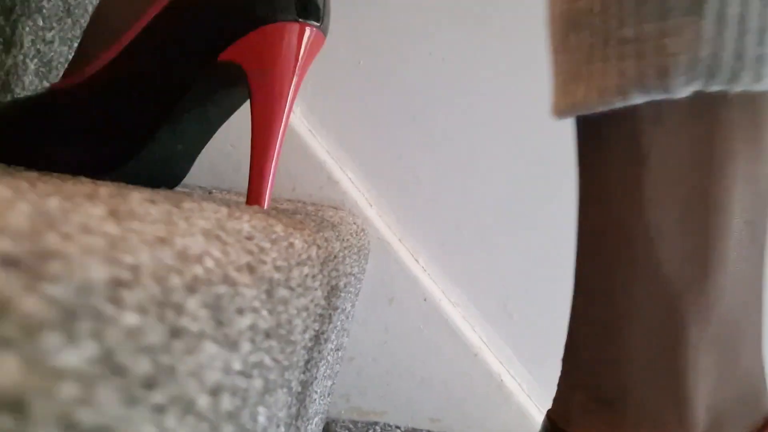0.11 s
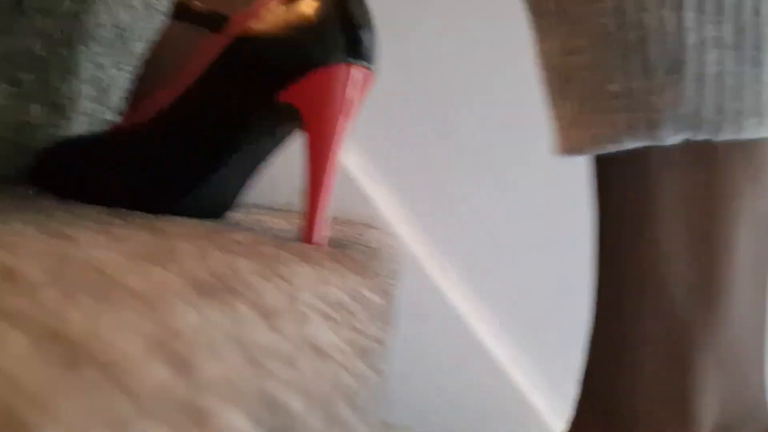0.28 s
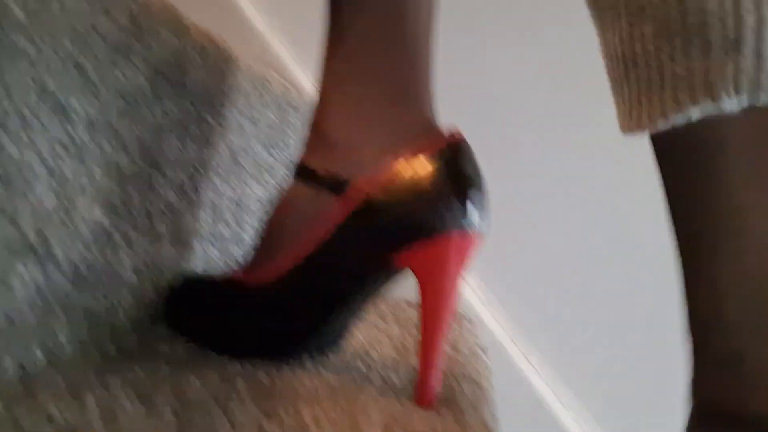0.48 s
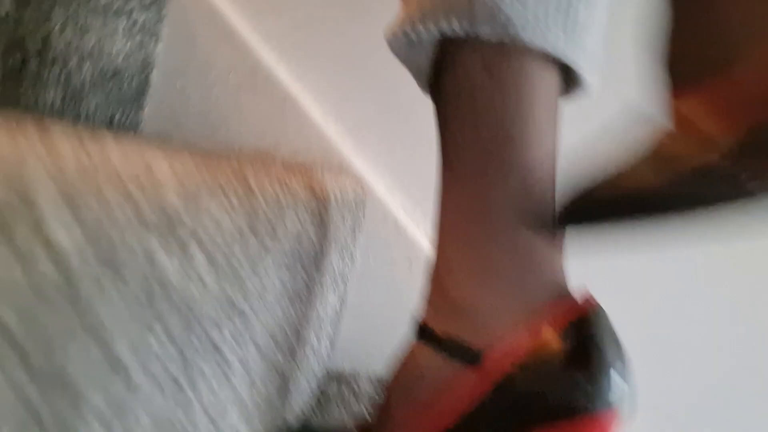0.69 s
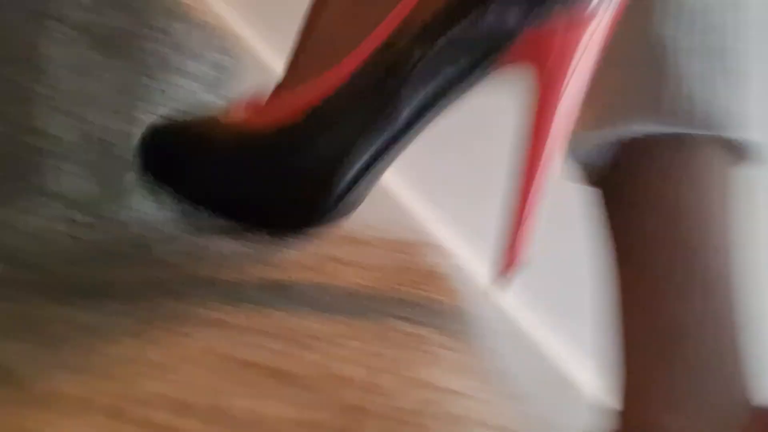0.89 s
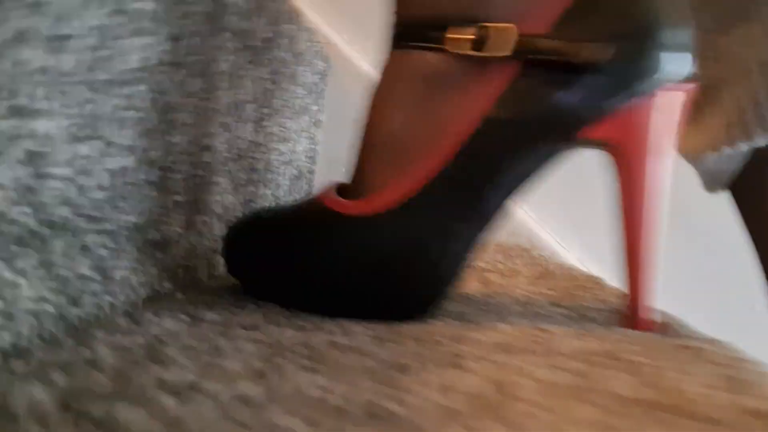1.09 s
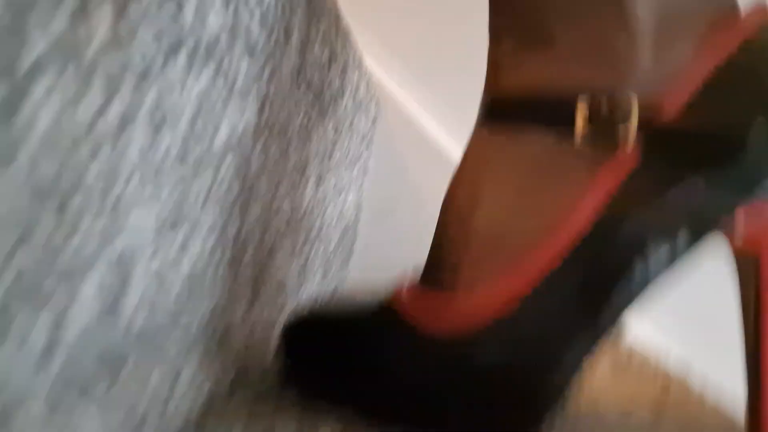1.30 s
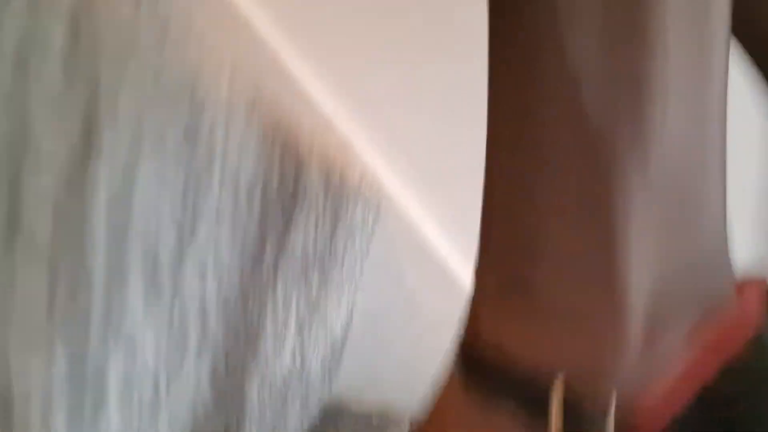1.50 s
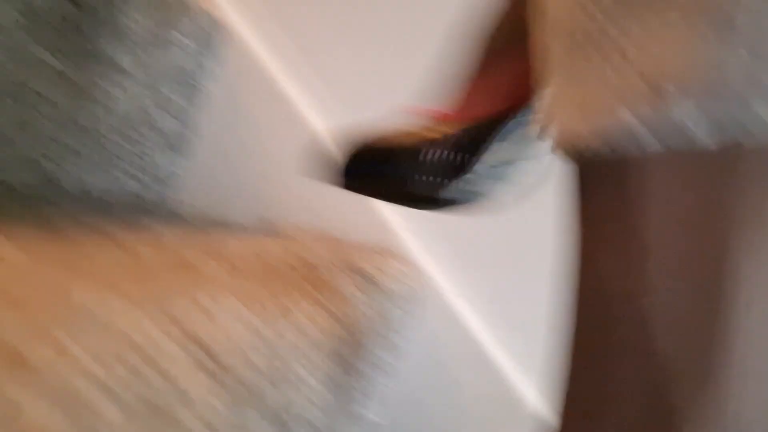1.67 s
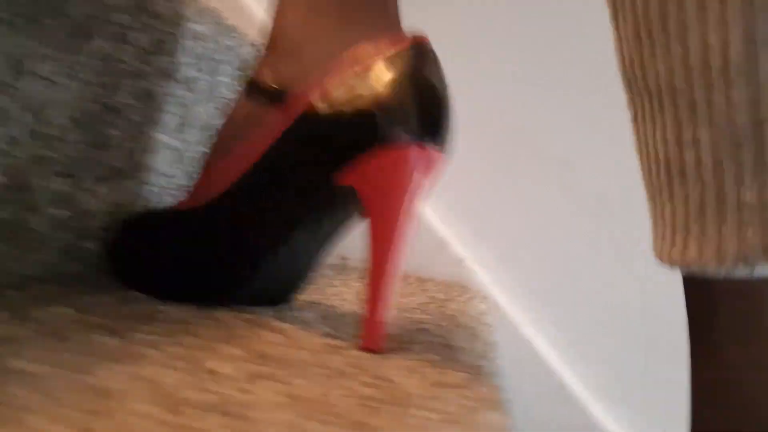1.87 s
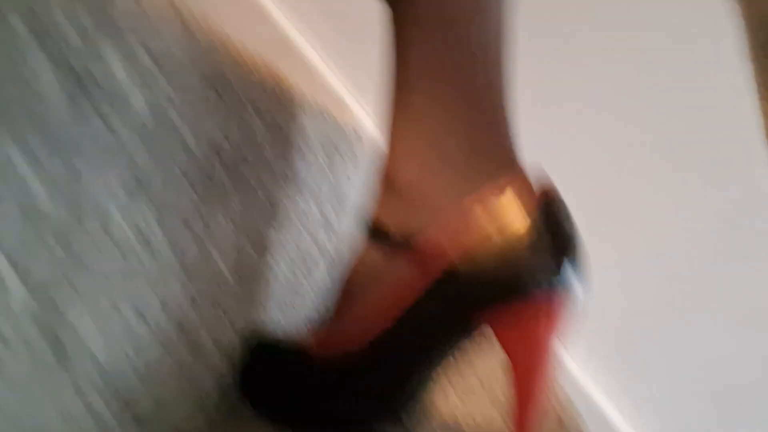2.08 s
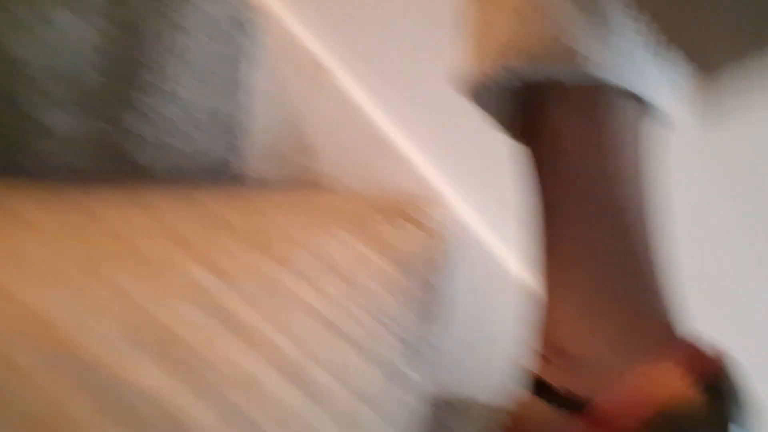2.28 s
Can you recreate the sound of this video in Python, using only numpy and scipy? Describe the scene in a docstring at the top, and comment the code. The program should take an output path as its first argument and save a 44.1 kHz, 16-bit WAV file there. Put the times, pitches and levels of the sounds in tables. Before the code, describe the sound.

High-heeled footsteps climb carpeted wooden stairs with muffled thuds, one sharp heel click and soft rustling

```python
"""A narrow stairwell: someone climbs carpeted wooden stairs in high heels, stereo microphone close to the feet.
Clothes rustle and swish as filtered noise, over a quiet room tone and the low rumble and hum of the stairs.
Each sole brushes the pile as grainy noise and lands with a thud: decaying tread tones and a boom off the walls.
Soles knock and heels click as soft-edged blows on ringing modes, scattered by near walls and the stairwell.
Short bright ticks of noise are heard here and there."""
import sys
import numpy as np
from scipy import signal
from scipy.io import wavfile

SR = 44100
rng = np.random.default_rng(int(sys.argv[2]) if len(sys.argv) > 2 else 0)


def dump_mix(stems):
    """Bounce the given channels to the path in sys.argv[1] as a 16-bit WAV at rate SR."""
    frames = np.atleast_2d(stems).T  # one column per channel
    limited = np.clip(frames, -1, 1)  # hard clip at full scale
    pcm = np.round(limited * 32767).astype(np.int16)
    wavfile.write(sys.argv[1], SR, pcm)


N = 105840
T = np.arange(N) / SR   # seconds


def from_db(db):
    """Decibels to amplitude gain."""
    return 10 ** (np.asarray(db) / 20)


def rms_one(x):
    """Scale to unit rms."""
    return x / np.sqrt(np.mean(x ** 2) + 1e-30)


def pan(db):
    """Left and right gains, as a column, for a left-minus-right difference in dB."""
    return from_db(np.array([[db], [-db]]) / 2)


def at_hz(points, hz):
    """Read a table of (Hz, value, ..) on a log-frequency axis."""
    table_hz, values = np.array(points)[:, 0], np.array(points)[:, 1]
    return np.interp(np.log(hz), np.log(table_hz), values)


def level(rows):
    """Gain over time from (s, dB) rows."""
    return from_db(np.interp(T, *np.transpose(rows)))


def dying(t60):
    """Exponential decay that falls 60 dB in t60 seconds."""
    return np.exp(-np.log(1000) * T / t60)


def ring(hz, t60):
    """A struck mode: a decaying sine of unit starting envelope."""
    return np.sin(2 * np.pi * hz * T) * dying(t60)


def struck_modes(modes):
    """Ring of a struck object: its modes summed with alternating sign."""
    total = 0
    for k, (hz, db, t60) in enumerate(modes):
        total = total + (-1) ** k * from_db(db) * ring(hz, t60)
    return total


def through(x, response):
    """Play a signal through an impulse response."""
    return signal.fftconvolve(np.atleast_2d(x), np.atleast_2d(response), axes=-1)[:, :N]


def bandpass(x, low, high):
    """Second-order Butterworth design between two frequencies in Hz."""
    return signal.sosfilt(signal.butter(2, [low, high], "band", fs=SR, output="sos"), x)


def soften(x, hz):
    """Two-pole low-pass."""
    return signal.sosfilt(signal.butter(2, min(hz, .45 * SR), fs=SR, output="sos"), x + 1e-18)


def delayed(x, s):
    """Shift later by s seconds."""
    return np.concatenate([np.zeros(int(max(s, 0) * SR)), x])[:N]


def contact(s, hz):
    """A unit impulse at s seconds, cushioned above hz."""
    return soften(delayed(signal.unit_impulse(N), s), hz)


def blow(s, db, contact_hz):
    """A contact cushioned by tip and carpet in turn, each a low-pass."""
    return from_db(db) * soften(contact(s, contact_hz), contact_hz)


# How alike the two microphone sides hear diffuse sound. Each row: frequency in Hz, left-right correlation (0-1).
STEREO_LIKENESS = [(120, 0.95), (300, 0.66), (600, 0.11), (1500, 0.04), (4000, 0.05), (12000, 0.032)]


def noise(spectrum, t60s=None):
    """Stereo noise in bands at the given dB per Hz; with t60s each band dies away."""
    edges = np.geomspace(20, 17000, 27)   # Hz
    # two stereo sources of unit density per Hz, used by alternate bands
    white = rng.standard_normal((2, 2, N)) * np.sqrt(SR / 2)
    out = 0
    for k, (low, high) in enumerate(zip(edges, edges[1:])):
        hz = np.sqrt(low * high)
        mid, side = bandpass(white[k % 2], low, high)
        alike = np.clip(at_hz(STEREO_LIKENESS, hz), 0, 1)
        band = np.sqrt((1 + alike) / 2) * mid + np.sqrt((1 - alike) / 2) * side * [[1], [-1]]
        fade = dying(at_hz(t60s, hz)) if t60s else 1
        out = out + band * (from_db(at_hz(spectrum, hz)) * fade)
    return out


GRAINS_PER_S = 690


def grainy(depth_db):
    """Fibres catch and let go: a fast random gain of unit rms, with depth_db the spread of its knots."""
    knots = rng.standard_normal(N)
    return rms_one(from_db(depth_db * np.interp(T * GRAINS_PER_S, np.arange(N), knots)))


# Quiet tone of the place. Each row: frequency in Hz, density in dB per Hz.
AIR_SPECTRUM = [(30, -87), (150, -101), (270, -95.5), (480, -112), (750, -109), (1300, -115),
                (2500, -121.5), (6000, -129), (15000, -138)]


def room_tone():
    """The still air of the stairwell: steady shaped noise."""
    return noise(AIR_SPECTRUM)


# Clothes over the climb. Each row: time in seconds, level in dB.
CLOTH_LEVEL = [(0, -72), (.018, -68.5), (.08, -71), (.23, -67), (.3, -75), (.46, -69.5), (.52, -78.5),
               (.6, -71), (.79, -80.5), (.9, -71.5), (1.0, -74.5), (1.05, -80), (1.37, -70), (1.44, -77),
               (1.56, -73.5), (1.72, -76.5), (1.89, -74.5), (1.95, -78.5), (2.18, -73.5), (2.25, -80),
               (2.4, -78.5)]
# Colour of the rustle. Each row: frequency in Hz, relative density in dB per Hz.
CLOTH_SPECTRUM = [(230, -1.5), (480, 3), (750, 9.5), (1500, 3.5), (2500, 2.5), (4000, -3.5), (6300, -1),
                  (7500, -7.5), (9900, -1.5), (11500, -12), (15500, -9.5)]
# Fabric slides past fabric. Each row: middle in seconds, half length in seconds, centre in Hz, level in dB.
SWISHES = [(0.043, 0.1, 7200, -67.5), (0.096, 0.13, 12900, -75.5), (0.652, 0.042, 1130, -68.5),
           (0.913, 0.15, 2420, -76), (1.566, 0.037, 1430, -72), (1.659, 0.019, 1240, -66),
           (1.89, 0.093, 9800, -82.5)]
SWISH_WIDTH = 0.63   # bandwidth of each filter pass, as a share of the centre frequency
CLOTH_GRAIN_DB, CLOTH_PAN_DB = 2, -1.5


def cloth():
    """Trouser legs rustle with each stride and now and then swish: grainy noise, broad or narrow."""
    out = level(CLOTH_LEVEL) * rms_one(noise(CLOTH_SPECTRUM))
    for s, half, hz, db in SWISHES:
        peak = signal.iirpeak(hz, 1 / SWISH_WIDTH, fs=SR)
        hiss = rng.standard_normal((2, N))
        for _ in range(2):   # two passes narrow the band
            hiss = signal.lfilter(*peak, hiss)
        out = out + from_db(db) * np.exp(-((T - s) / half) ** 2) * rms_one(hiss)
    return out * grainy(CLOTH_GRAIN_DB) * pan(CLOTH_PAN_DB)


# The staircase under shifting weight. Each row: time in seconds, level in dB.
RUMBLE_LEVEL = [(0, -59), (.6, -59.5), (.68, -55), (.78, -51.5), (.84, -58), (.92, -56), (.96, -65),
                (1.45, -53.5), (1.53, -63.5), (1.68, -52), (1.82, -49.5), (1.93, -55), (2.2, -57.5),
                (2.4, -58)]
# Colour of the rumble. Each row: frequency in Hz, relative density in dB per Hz.
RUMBLE_SPECTRUM = [(20, -11), (35, 0), (57, 14), (80, -1), (130, -6.5), (180, -21), (300, -37),
                   (500, -47.5), (2000, -77.5)]
# The stairwell's low hum. Each row: time in seconds, level in dB.
HUM_LEVEL = [(0, -66), (.62, -69), (.76, -56.5), (.93, -57.5), (1.1, -70), (1.5, -69), (1.68, -60.5),
             (1.85, -70), (2.4, -76)]
HUM_HZ, HUM_WIDTH_HZ = 120.6, 3.8   # resonance driven by noise


def rumble():
    """The loaded staircase rumbles as low noise and keeps a low standing wave humming."""
    resonance = np.sin(2 * np.pi * HUM_HZ * T) * np.exp(-np.pi * HUM_WIDTH_HZ * T)
    hum = through(rng.standard_normal(N), resonance)
    even = np.cos(np.angle(signal.hilbert(hum)))   # keep the wandering phase, level the swells
    smooth = bandpass(even, .85 * HUM_HZ, 1.15 * HUM_HZ)
    return level(RUMBLE_LEVEL) * rms_one(noise(RUMBLE_SPECTRUM)) + level(HUM_LEVEL) * rms_one(smooth)


# The sole brushes the pile. Each row: start in seconds, length in seconds, rub level in dB, grit level in dB.
SCUFFS = [(0.184, 0.046, -65.5, -70), (0.352, 0.0096, -66, -69), (0.382, 0.017, -65.5, -70),
          (0.429, 0.015, -84, -75), (0.633, 0.0052, -66, -67), (1.08, 0.029, -59.5, -67.5),
          (1.215, 0.013, -61, -78), (1.55, 0.02, -68, -74.5), (1.644, 0.016, -69.5, -73.5),
          (1.973, 0.035, -58, -70.5), (2.051, 0.045, -67, -89), (2.129, 0.032, -67, -85)]
SCUFF_ATTACK_S, SCUFF_RELEASE_S = 0.005, 0.017
# The heel tip squeezes the pile before the strongest heel hit: end in seconds, rise time in seconds, level in dB.
PILE_SQUEEZE = (1.279, 0.0054, -42)
# Short bright ticks. Each row: start in seconds, level in dB.
TICKS = [(0.361, -68), (0.722, -68), (1.2867, -61), (1.984, -58.5), (2.071, -69), (2.078, -69),
         (2.147, -71), (2.2128, -65)]
TICK_DECAY_S = 0.0019
# Colour of the dull rub. Each row: frequency in Hz, relative density in dB per Hz.
RUB_SPECTRUM = [(150, -16), (400, 3), (1000, -1), (1700, -2.5), (3000, -12), (6000, -28), (15000, -86)]
# Colour of the fine grit and the ticks. Each row: frequency in Hz, relative density in dB per Hz.
GRIT_SPECTRUM = [(500, -39), (2500, -1), (5000, 4.5), (8000, 1), (10000, 6), (12000, -4), (15500, -1)]
PILE_GRAIN_DB, SCUFF_PAN_DB = 2.5, 1


def scuffs():
    """Soles brush the pile with a dull rub and a fine grit, both grainy noise; ticks are short bright noise bursts."""
    rub, grit = 0, 0
    for s, length, rub_db, grit_db in SCUFFS:
        attack = np.clip((T - s) / SCUFF_ATTACK_S, 0, 1)
        release = np.exp(-np.maximum(T - s - length, 0) / SCUFF_RELEASE_S)
        rub = rub + from_db(rub_db) * attack * release
        grit = grit + from_db(grit_db) * attack * release
    s, rise, db = PILE_SQUEEZE
    rub = rub + from_db(db) * np.exp(-np.abs(T - s) / rise) * (T < s)
    ticks = sum(from_db(db) * delayed(np.exp(-T / TICK_DECAY_S), s) for s, db in TICKS)
    grain = grainy(PILE_GRAIN_DB)
    bursts = rub * rms_one(noise(RUB_SPECTRUM)) + (grit + ticks) * rms_one(noise(GRIT_SPECTRUM))
    return pan(SCUFF_PAN_DB) * grain * bursts


# The stairwell's answer to a blow. Each row: frequency in Hz, density in dB per Hz.
STAIRWELL_SPECTRUM = [(30, -91), (70, -73.5), (140, -67.5), (230, -62.5), (330, -62), (500, -71.5),
                      (850, -78), (1500, -85), (3000, -82.5), (6000, -106), (15000, -113)]
# How long that answer lasts. Each row: frequency in Hz, 60 dB decay in seconds.
STAIRWELL_T60 = [(50, 0.72), (180, 0.62), (330, 0.27), (700, 0.37), (1600, 0.17), (10000, 0.035)]
# Standing waves between the walls. Each row: frequency in Hz, level in dB, 60 dB decay in seconds.
WALL_MODES = [(117.51, -33.5, 0.56), (226.5, -48, 0.47), (302.2, -54, 0.77), (373, -48, 0.41),
              (404, -50.5, 0.57), (462.3, -49.5, 0.2), (682, -60, 0.55), (837, -59, 0.58)]
STAIRWELL_PAN_DB = 3


def stairwell():
    """Response of the stairs and walls: a diffuse tail and a few standing waves."""
    waves = sum(from_db(db) * ring(hz, t60) for hz, db, t60 in WALL_MODES)
    return (noise(STAIRWELL_SPECTRUM, STAIRWELL_T60) + waves) * pan(STAIRWELL_PAN_DB)


# Weight lands on a tread. Each row: start in seconds, flex in Hz, flex level in dB, board in Hz,
# board level in dB, level sent to the stairwell in dB, contact cut-off in Hz.
FOOTFALLS = [(.196, 59.5, -27.5, 90.8, -34, -6.5, 109), (.204, 42.6, -38, 142.8, -31.5, -5.5, 120),
             (.286, 59.3, -35.5, 138, -44.5, -9, 190), (0.353, 59, -40.5, 95.3, -47, -16.5, 310),
             (1.003, 50.6, -39, 143, -46, -14, 242), (1.086, 58, -42, 146, -43, -10.5, 405),
             (1.123, 47, -35.5, 119.7, -43.5, -15.5, 355), (1.2194, 50.8, -41, 326, -42.5, -15.5, 605),
             (1.28, 47.8, -52, 162.3, -33.5, -10, 514), (1.298, 71, -54, 120.3, -41, -7, 474),
             (1.575, 67.5, -47.5, 136.5, -49.5, -23.5, 298), (1.983, 45.5, -38.5, 117.2, -45, -4, 334),
             (2.091, 44, -64, 117.7, -49, -11, 357)]
FLEX_T60_S, LOAD_S = 0.39, 0.0058
BOARD_RING_CYCLES = 37.6   # cycles in which the board falls 60 dB


def thuds(room):
    """Each tread flexes and its board rings at pitches of its own; the cushioned blow fills the stairwell."""
    treads, blows = 0, 0
    loading = 1 - np.exp(-(T / LOAD_S) ** 2)   # the weight comes on gradually
    for s, flex_hz, flex_db, board_hz, board_db, room_db, contact_hz in FOOTFALLS:
        flex = from_db(flex_db) * ring(flex_hz, FLEX_T60_S)
        board = from_db(board_db) * ring(board_hz, BOARD_RING_CYCLES / board_hz)
        treads = treads + delayed((flex + board) * loading, s)
        blows = blows + blow(s, room_db, contact_hz)
    return treads + through(blows, room)


HEEL_SINK_S, SINK_HZ, SINK_DB = 0.00269, 940, -9.5   # bottoming out in the carpet just after the touch
SHADOW_HZ, SHADOW_LEAK_DB = 2010, -10.5   # the right port faces away from the shoes and hears them duller
NEAR_WALL_DB, NEAR_WALL_T60_S, NEAR_WALL_BUILD_S = -10, 0.11, 0.0093   # the build is a 60 dB time too


def knocks(room, hits, shoe):
    """A touch and a duller bottoming-out ring the shoe; near walls scatter it and the stairwell follows."""
    direct, sent = 0, 0
    for s, db, contact_hz, pan_db, room_db in hits:
        force = blow(s, db, contact_hz)
        direct = direct + pan(pan_db) * force
        sent = sent + from_db(room_db) * force
    bottoming = from_db(SINK_DB) * delayed(soften(shoe, SINK_HZ), HEEL_SINK_S)
    left, right = through(direct, shoe + bottoming)
    scatter = rng.standard_normal((2, N)) * dying(NEAR_WALL_T60_S) * (1 - dying(NEAR_WALL_BUILD_S))
    wall_response = from_db(NEAR_WALL_DB) * rms_one(scatter) / np.sqrt(N)
    near = through((left + right) / 2, wall_response)
    leak = from_db(SHADOW_LEAK_DB)
    shadowed = leak * right + (1 - leak) * soften(right, SHADOW_HZ)
    return np.array([left, shadowed]) + near + through(sent, room)


# The stiff sole knocks through the pile. Each row: start in seconds, level in dB, contact cut-off in Hz,
# left minus right in dB before the shadow, level sent to the stairwell in dB re the blow.
SOLE_KNOCKS = [(.202, -18, 3180, 12, -4), (0.389, -21.5, 6000, 4, -6.5), (1.088, -16.5, 3200, 7, -2.5),
               (1.104, -14, 980, 6, -1), (1.1248, -18.5, 1970, 10, -3), (1.222, -10, 780, -5, -8),
               (1.649, -28.5, 3030, 1, -3.5), (1.9811, -21, 6540, 19, -10.5), (2.052, -22, 2000, -1, -6),
               (2.091, 2, 1950, 5.5, -19), (2.1103, -16.5, 1980, -8, -5), (2.1453, -15.5, 2800, 8, -9.5),
               (2.164, -22.5, 1500, -1, -7), (2.2117, -27, 6040, 10, -14)]
# The sole on the tread. Each row: frequency in Hz, level in dB, 60 dB decay in seconds.
SOLE_MODES = [(297, -36.5, 0.032), (773, -38, 0.018), (1057, -36.5, 0.016), (1270, -43, 0.011),
              (1500, -41, 0.019), (1787, -40.5, 0.023), (3000, -37.5, 0.0024)]


def soles(room):
    """The platform sole gives a dull, short knock from a few quickly damped modes."""
    return knocks(room, SOLE_KNOCKS, struck_modes(SOLE_MODES))


# The hard heel tip strikes through the carpet. Each row: start in seconds, level in dB, contact cut-off in Hz,
# left minus right in dB before the shadow, level sent to the stairwell in dB re the blow.
HEEL_HITS = [(1.2209, -24.5, 5200, 2, -6), (1.234, -21.5, 6560, 2, 5), (1.2787, -0.6, 15100, 5.5, -0.5),
             (1.297, -22, 6030, 4, -3.5)]
# The heel on the tread. Each row: frequency in Hz, level in dB, 60 dB decay in seconds.
HEEL_MODES = [(222, -30.5, 0.04), (502, -25.5, 0.032), (688, -33.5, 0.027), (832, -37, 0.082),
              (1025, -43.5, 0.092), (1445, -23.5, 0.022), (1582, -25, 0.025), (1777, -39.5, 0.053),
              (2056, -30.5, 0.008), (3166, -35.5, 0.031), (5240, -34, 0.002), (7410, -38, 0.0062),
              (9220, -35, 0.0046), (12400, -38, 0.0012)]


def heels(room):
    """The thin heel gives a bright, ringing click from modes that reach high into the treble."""
    return knocks(room, HEEL_HITS, struck_modes(HEEL_MODES))


def scene():
    """Steps, ticks, rustle, rumble and room tone together in one stairwell."""
    room = stairwell()
    steps = thuds(room) + heels(room) + soles(room)
    return steps + scuffs() + cloth() + rumble() + room_tone()


# The microphone's colour. Each row: frequency in Hz, gain in dB, Q.
MIC_COLOUR = [(4450, -0.5, 9.5), (5110, 4, 25), (8420, -9.5, 14), (9950, 3, 11.4)]
CUTOFF_HZ = 15800


def record(dry):
    """The microphone ripples the treble with narrow peaks and dips; the top is cut steeply."""
    for hz, db, q in MIC_COLOUR:
        dry = dry + (from_db(db) - 1) * signal.lfilter(*signal.iirpeak(hz, q, fs=SR), dry)
    return signal.sosfilt(signal.ellip(10, .1, 70, CUTOFF_HZ, fs=SR, output="sos"), dry)


dry = scene()
out = record(dry)
dump_mix(out)
```